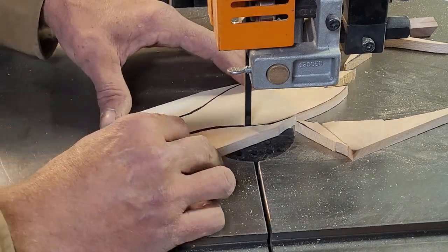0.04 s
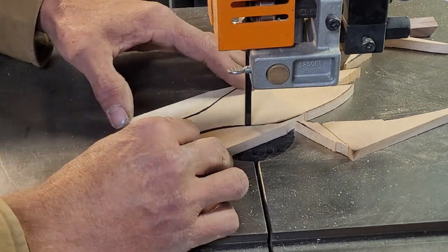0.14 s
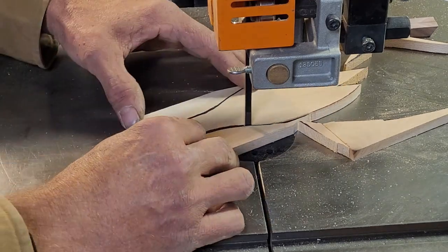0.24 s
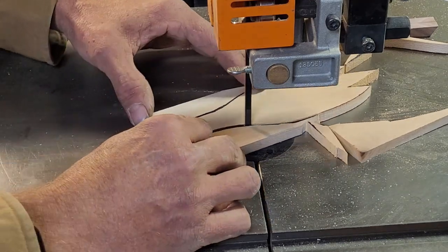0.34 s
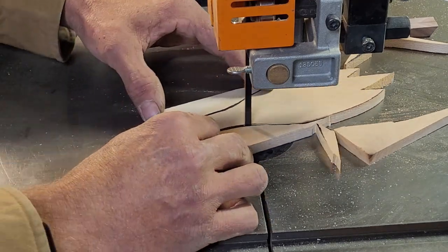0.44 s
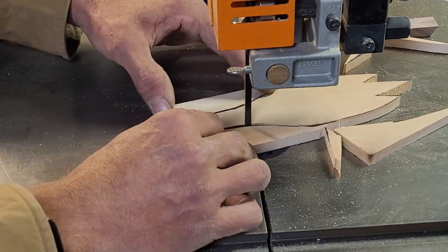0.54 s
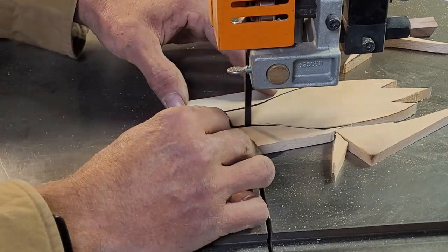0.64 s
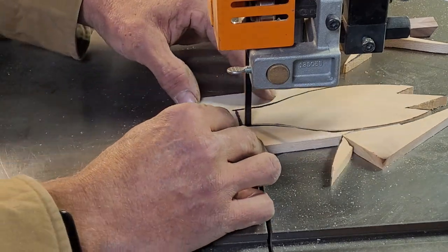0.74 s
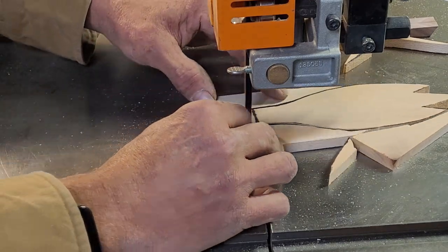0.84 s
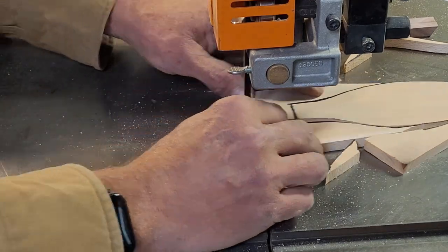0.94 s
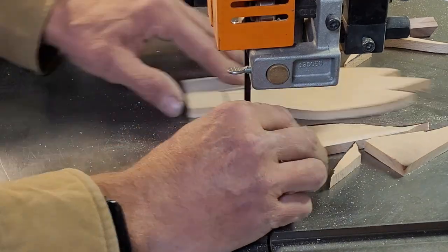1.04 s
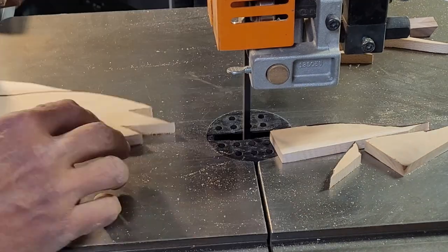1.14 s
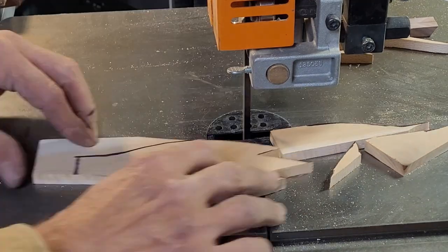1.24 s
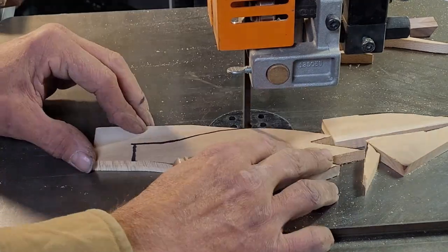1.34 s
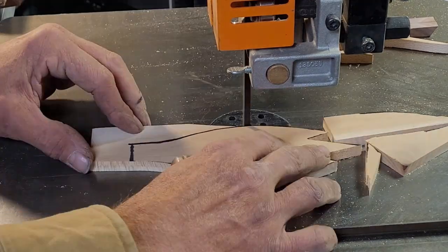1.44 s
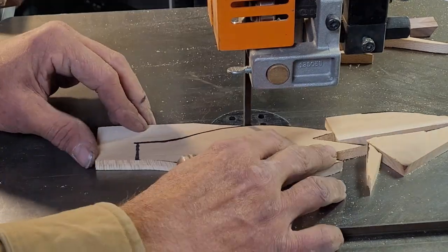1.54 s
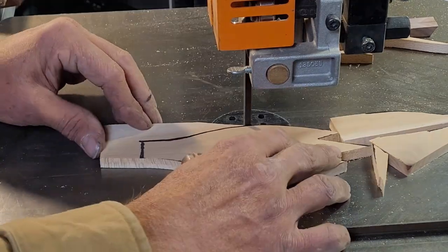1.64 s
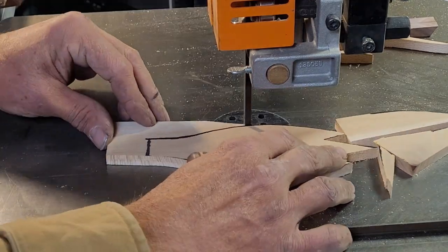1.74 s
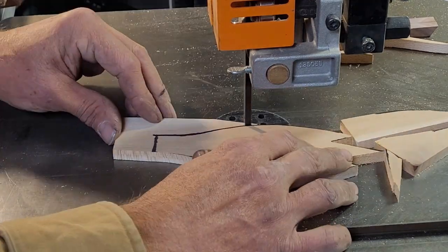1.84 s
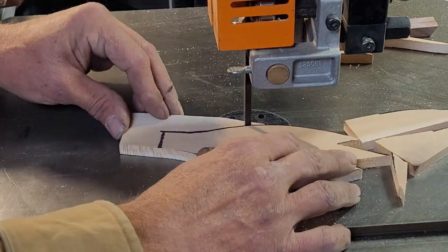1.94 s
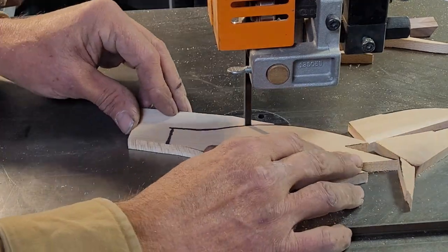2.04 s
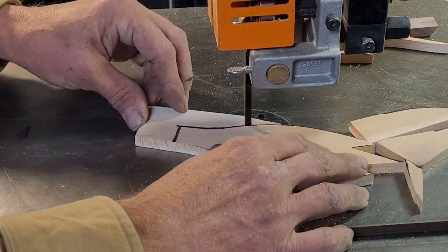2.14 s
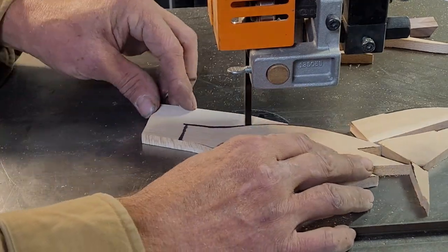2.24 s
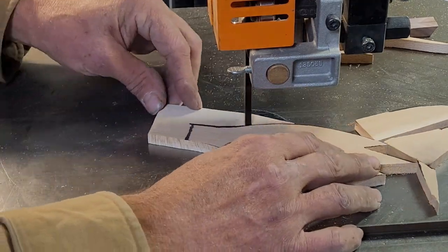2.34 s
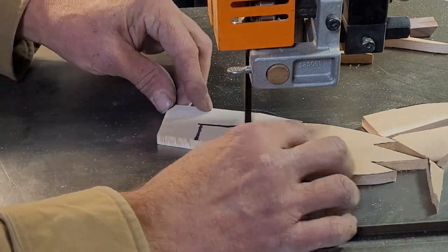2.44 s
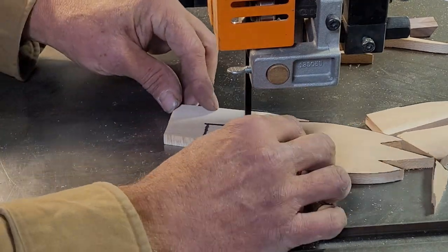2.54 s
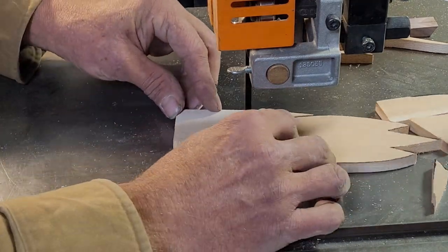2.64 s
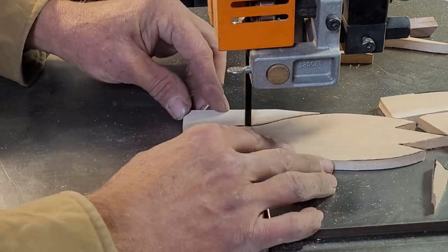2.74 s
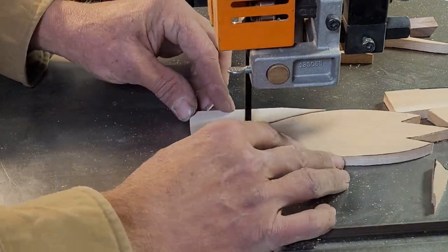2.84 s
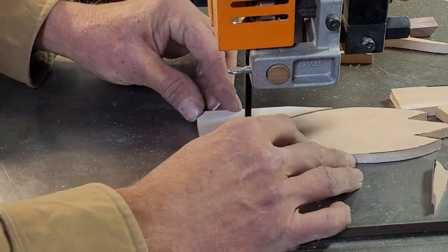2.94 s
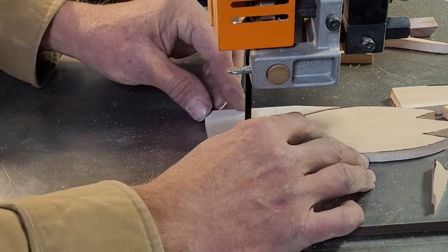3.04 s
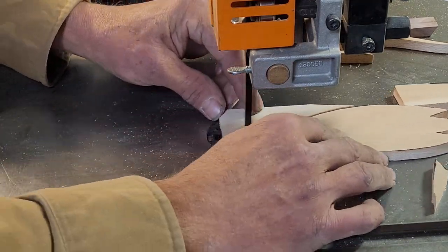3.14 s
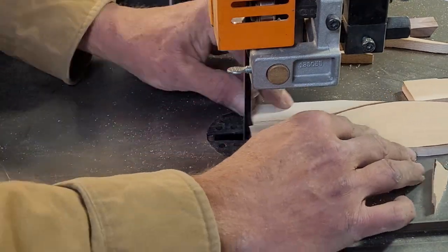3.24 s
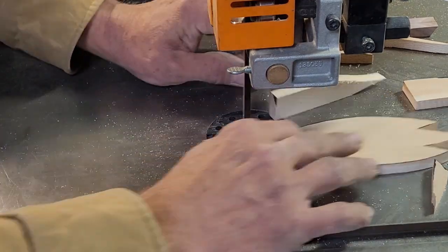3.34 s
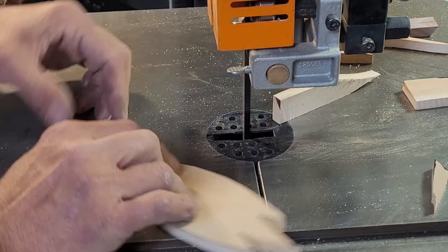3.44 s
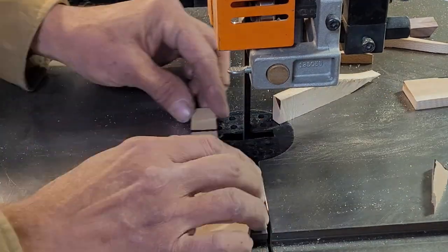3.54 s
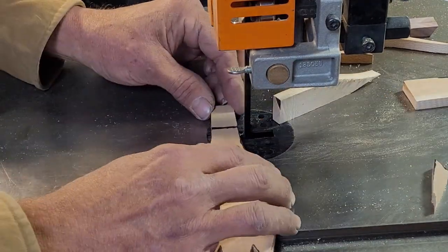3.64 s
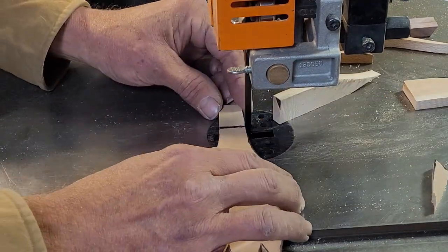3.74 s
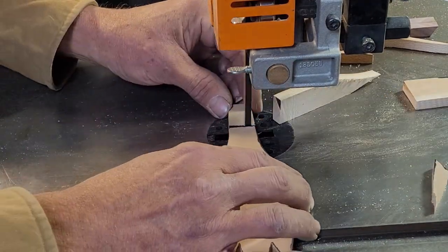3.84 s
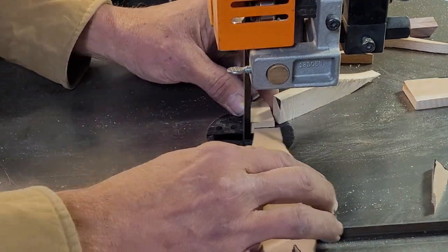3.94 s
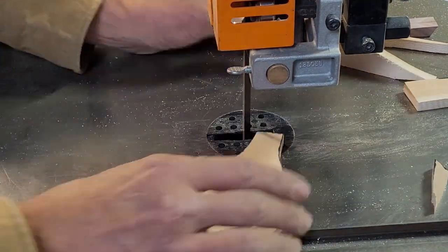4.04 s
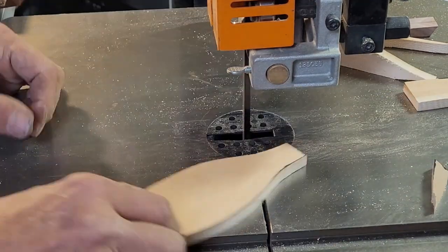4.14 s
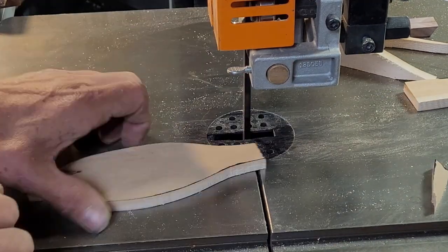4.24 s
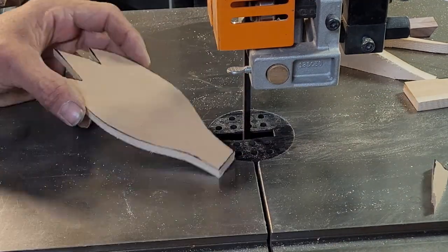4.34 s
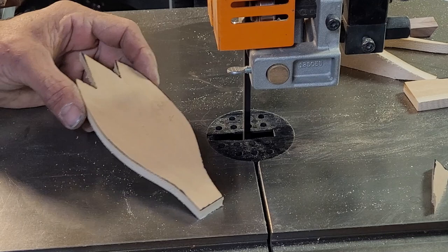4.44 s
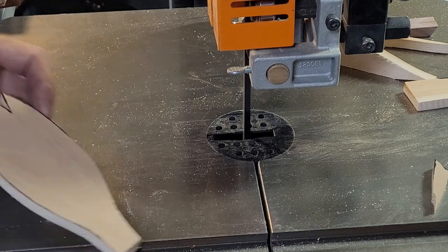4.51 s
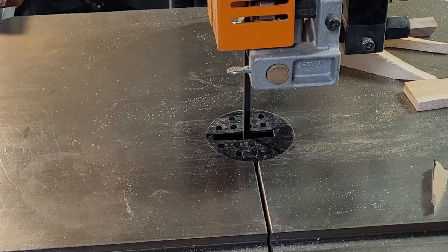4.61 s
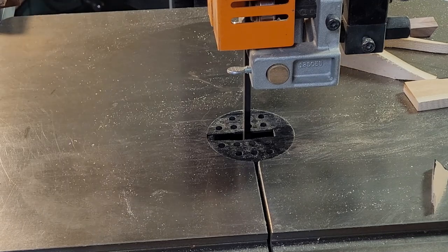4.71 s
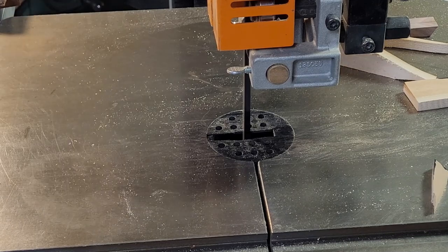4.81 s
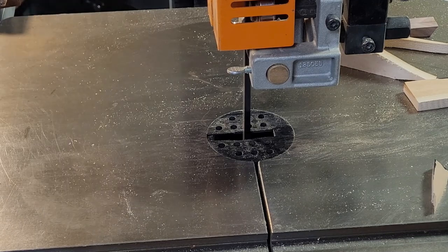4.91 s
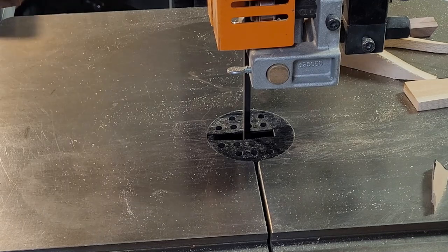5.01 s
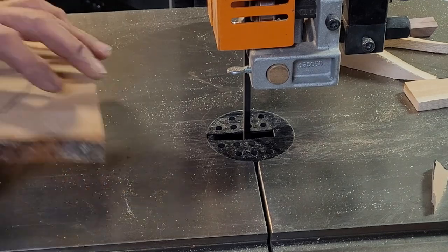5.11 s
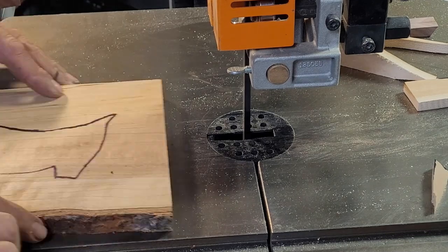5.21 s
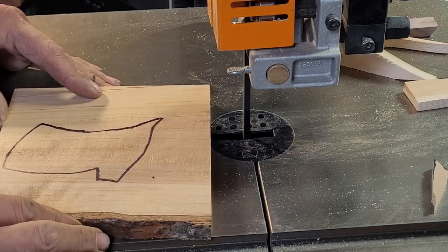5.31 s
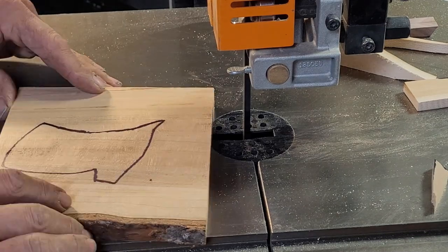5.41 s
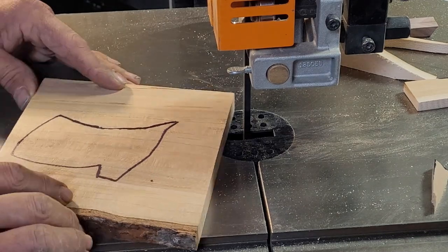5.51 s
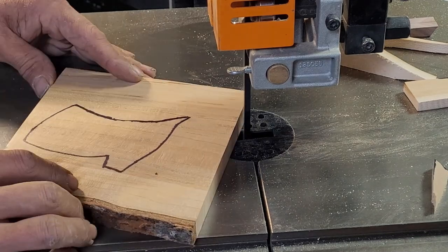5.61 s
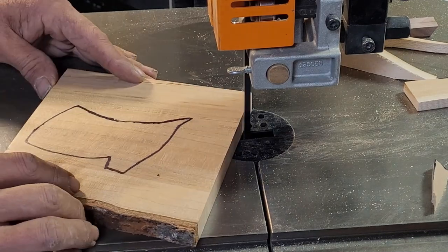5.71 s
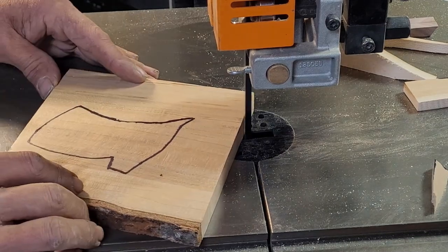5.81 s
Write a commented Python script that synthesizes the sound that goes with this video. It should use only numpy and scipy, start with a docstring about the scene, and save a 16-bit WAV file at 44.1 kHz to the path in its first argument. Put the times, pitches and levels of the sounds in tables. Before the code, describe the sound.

Close up in a workshop, a bandsaw hums and whirrs steadily. Its teeth rasp through a thin hardwood board while the blade whistles and squeals. There are three cuts, the middle one longest and the last very short, each ending with a sharp falling twang as the blade springs free. The saw then idles, a chip ticks, and another board clatters onto the metal table.

```python
"""A bandsaw runs close by in a workshop: its motor hums, its wheels and guides whirr.
From the start its teeth rasp through a thin hardwood board and set the blade singing. At 1 s the
blade springs free with a falling twang. A long cut and a short one follow, with twangs at 3.3 s and 4 s.
A chip ticks at 4.8 s, a new board clatters onto the iron table at 5.2 s and just meets the teeth at
the end. All along, an automatic gain control ducks the steady machine under every loud sound."""
import sys
import numpy as np
from scipy import signal
from scipy.fft import rfft, irfft, next_fast_len
from scipy.io import wavfile
from scipy.ndimage import uniform_filter1d, map_coordinates

SR = 44100
rng = np.random.default_rng(int(sys.argv[2]) if len(sys.argv) > 2 else 0)


def file_out(sig):
    """Save sig as 16-bit WAV at sys.argv[1]."""
    # one column per channel
    cols = np.atleast_2d(sig).T
    # limit, then scale
    lim = np.clip(cols, -1, 1)
    pcm = np.round(lim * 32767).astype(np.int16)
    wavfile.write(sys.argv[1], SR, pcm)


N = 258867

TURN_HZ = 25.46  # turns of the drive a second

# Table levels are relative: the functions add their own gains.
# The motor's hum. Each row: multiple of the motor's pitch, level in dB.
HUM_HARMONICS = [(1, 0), (2, 0), (3, 0), (4, -56)]
# The machine's low noise and its brighter running noise. Each row: frequency in Hz, level in dB.
RUMBLE_SPECTRUM = [(20, -14), (60, -11.5), (135, -12.5), (175, 0), (280, -3.5), (330, -0.5), (430, -1.5),
                   (620, 2), (800, 0.5), (1100, -9.5), (2000, -54)]
WHIRR_SPECTRUM = [(470, -35.5), (800, -5), (1080, -2), (1210, -2), (1820, -2), (1990, -11), (2090, -7.5),
                  (2280, -11), (2620, -10), (2970, -13.5), (3710, -12.5), (4310, -20), (4830, -16.5),
                  (9470, -13.5), (15800, -25.5)]
# Tones of the wheels and frame. Each row: pitch in Hz, level in dB.
FRAME_TONES = [(790.5, -61.5), (942.1, -65.5), (1045.5, -56), (1152, -58.5), (1448, -63.5), (1507, -67),
               (1620, -57), (1766, -59.5), (1884, -61.5), (2019, -63), (2143, -64), (2525, -63.5),
               (2713, -73), (3284, -67), (3978, -63.5), (4409, -69), (5954, -84), (6702, -63.5),
               (8161, -63.5), (8780, -72), (9636, -74), (10557, -75), (11596, -76)]
# How hard the machine shakes. Each row: time in seconds, whirr gain in dB, frame gain in dB.
SHAKE_LEVELS = [(0, 1, 0.5), (.85, 0, 4.5), (1.25, -1.5, 2), (1.48, 2, 4), (1.75, 0, 2.5), (2.4, 0, -2),
                (3.45, 0.5, 0.5), (3.8, -0.5, 0.5), (4.2, 0, 1), (4.7, 0, 2), (4.98, 0.5, 0.5),
                (5.4, -0.5, -0.5), (5.87, -.5, -0.5)]
# Resonances of the idling blade and its guides. Each row: frequency in Hz, width in Hz, level in dB.
GUIDE_MODES = [(2757, 41, -7), (3990, 42, -1.5), (4210, 55, -10), (4373, 39, -1.5), (5790, 68, -11.5),
               (8260, 130, -15), (8970, 73, -17), (9700, 160, -20), (10500, 150, -15.5), (11900, 90, -26)]
# The droning cover. Each row: time in seconds, level in dB.
COVER_LEVELS = [(0.0, -58), (0.8, -54.5), (1.26, -64), (1.49, -52.5), (1.86, -62), (2.17, -53), (2.53, -69),
                (3.63, -92), (3.86, -59), (4.05, -75), (4.17, -56), (4.33, -59), (4.38, -80), (4.51, -56),
                (5.21, -59), (5.28, -79), (5.44, -60), (5.87, -62)]

# Resonances of a flying chip's tick. Each row: frequency in Hz, width in Hz, level in dB.
CHIP_MODES = [(8860, 660, -5), (10300, 570, -2), (14500, 3000, -15)]
# The new board lands. Each row: time in seconds, then knock, click and crack levels in dB.
BOUNCES = [(5.2224, -27, -52, -41), (5.2304, -35, -37, -29), (5.2332, -29.5, -50, -42),
           (5.2372, -37, -29, -27), (5.2392, -40, -38, -28), (5.2433, -31, -28, -30),
           (5.2581, -31, -30, -20.5)]
# Board and table ring, low and high. Each row: pitch in Hz, level in dB, seconds to fade by 60 dB.
KNOCK_MODES = [(883, -8.7, .08), (1060, -14, .05), (1370, -11, .05), (1640, -11, .05), (1840, -11, .05),
               (2130, -13, .04), (2330, -13, .035), (2760, -9, .035), (3455, -4.5, .035), (3563, -11, .035)]
CLICK_MODES = [(4334, -16, .03), (4850, -10, .045), (5643, -4, .055), (5790, -5, .07), (5964, -10, .06),
               (9251, -1.5, .045), (9870, -8, .03)]
# The crack of a bounce. Each row: frequency in Hz, level in dB.
CRACK_SPECTRUM = [(400, -34), (1000, -11), (3000, -4), (3900, -6), (5500, 0), (7300, -7), (9800, 2),
                  (11000, -5), (13400, -8), (15200, -5.5)]

# Passing pure rings of the blade.
# Each row: start and end in seconds, pitch in Hz, level in dB, throb depth from 0 to 1.
BLADE_RINGS = [(0.47, 1.005, 2597, -49.5, .7), (1.068, 1.45, 2680, -59, .1), (1.536, 1.76, 6716, -51, .3),
               (1.66, 2.15, 7103, -56, .3), (4.08, 4.48, 2687, -56, .1)]
# Brief squeals. Each row: start and end in seconds, pitch in Hz, width in Hz, level in dB.
BLADE_SQUEALS = [(-0.1, 0.348, 5600, 1400, -44.5), (-0.07, 0.34, 4870, 100, -39),
                 (-0.05, 0.363, 5165, 63, -44), (-0.05, 0.33, 6080, 130, -51), (0.45, 1.01, 2610, 110, -50),
                 (0.993, 1.04, 1580, 180, -40), (0.963, 1.06, 13800, 3000, -44),
                 (1.703, 2.352, 1827, 130, -47.5), (2.0, 2.353, 10200, 3100, -43),
                 (0.96, 1.044, 4850, 450, -41), (2.238, 2.5, 2600, 74, -53), (2.307, 2.37, 7900, 300, -45),
                 (2.658, 3.352, 1172, 57, -55.5), (3.192, 3.317, 2650, 370, -45.5),
                 (3.23, 3.338, 4800, 350, -47), (3.24, 3.336, 4700, 2600, -45),
                 (3.305, 3.34, 6150, 600, -38.5), (3.828, 4.02, 4780, 220, -47.5),
                 (3.832, 4.003, 3526, 74, -47), (3.81, 3.93, 2620, 83, -49),
                 (3.99, 4.086, 13200, 1500, -51)]
# The blade springs free. Each row: time in seconds, twang level in dB, level of brushing teeth in dB.
BLADE_RELEASES = [(1.029, -25.5, -46), (3.3465, -25.5, -42), (4.040, -24.5, -40)]
# A twang's bending waves. Each row: peak in seconds after the release, rise and decay in seconds,
# pitch at the peak in Hz, fall in Hz a second, roughness in radians, level in dB.
BENDING_WAVES = [(.003, .002, .003, 4270, 30000, .3, -1), (.0095, .002, .006, 4030, 12000, .7, -6),
                 (.011, .005, .005, 3200, 25000, .9, -7.5), (.0235, .011, .007, 2680, 16000, .25, -2.5),
                 (.038, .003, .012, 2600, 14000, 1.2, -11.5), (.052, .012, .01, 1650, 22000, 1.4, -13.5)]
# Resonances of the freed blade. Each row: frequency in Hz, width in Hz, level in dB.
RATTLE_MODES = [(2650, 300, -2), (3300, 400, -3), (4200, 300, -3), (6300, 150, -12), (8300, 300, -15)]

# The teeth are in the wood. Each row: start, end and fade-in time in seconds,
# starting load in dB, growth in dB a second as the push gets harder.
SAW_CUTS = [(-0.2, 1.02, .05, -45.5, 3.5), (1.52, 3.353, 0.23, -44.5, 1.5), (3.8, 4.046, 0.023, -45, 14),
            (5.832, 6.3, 0.014, -49.5, 0)]
# The noise of tearing wood. Each row: frequency in Hz, level in dB.
RASP_SPECTRUM = [(1500, -42), (3000, -15), (4300, -8), (5500, -1), (6100, 0.5), (6550, -3), (7300, -0.5),
                 (8000, 0), (8900, -5), (9500, -2.5), (11500, 2), (12500, -1), (14300, -1), (15700, -8.5)]
# Resonances of the board, then of the cutting blade: bright ones, its low note, its whistle.
# Each row: frequency in Hz, width in Hz, level in dB.
BOARD_MODES = [(1150, 84, 1.5), (1660, 520, -2.5), (1740, 34, 8), (2580, 58, 6.5), (2820, 220, -1.5),
               (3410, 510, 2.5)]
STEEL_MODES = [(2860, 60, -2), (3200, 200, -1), (3550, 200, -3), (4400, 70, -6), (5340, 70, -3),
               (6130, 90, 1), (6290, 120, 4), (6700, 60, -1), (7400, 70, -4), (7950, 120, -3),
               (8400, 110, 1), (9270, 150, 4), (9500, 150, 2), (10020, 200, 2), (10850, 160, -2),
               (11470, 220, 1), (12350, 160, -3), (13300, 200, -4), (15650, 170, 2)]
LOW_NOTE_MODES = [(1744, 69, 0)]
WHISTLE_MODES = [(4700, 110, -4), (4850, 100, -1), (4968, 30, 3), (5160, 50, -7)]
# The cutting blade's three notes and its faint extra tones. Each row: pitch in Hz, level in dB.
LOW_NOTE_TONES = [(1680.4, -17), (1731.4, 0), (1807.8, -19), (1884.1, -14)]
MIDDLE_NOTE_TONES = [(3972, -2), (3997, -9), (4022.7, -5)]
WHISTLE_TONES = [(4659.2, -18), (4684.6, -18), (4761, -16), (4837.9, -14), (4863.3, -16), (4888.3, -15),
                 (4965, 2.5), (4990.4, -9), (5041.3, -15), (5143, -18), (5168.6, -16)]
FAINT_TONES = [(2596.4, -19), (2647.3, -19), (6186.9, -18), (6874, -22), (7102.8, -17), (8403, -19),
               (11451, -24), (13392, -16)]
# How loudly the blade sings, one list for each full cut.
# Each row: time in seconds, then low note, whistle and middle note levels in dB.
SONG_LEVELS = [
    [(0.0, -45.5, -49, -60), (0.19, -44.5, -40.3, -60), (0.27, -46, -46.5, -60), (0.55, -45, -51.5, -59),
     (0.7, -42, -54, -58), (0.9, -41.2, -57.5, -55), (1.02, -40.5, -53, -49)],
    [(1.7, -48, -53.5, -56), (1.92, -48, -52, -53), (2.15, -48.2, -55.5, -61), (2.33, -47.5, -57.5, -56),
     (2.55, -47, -50.5, -49.5), (2.7, -47.6, -52.5, -51.5), (2.79, -48, -57, -59), (2.9, -48, -54, -53),
     (3.08, -48, -55, -51), (3.2, -44, -51.5, -53), (3.24, -45.5, -58, -55), (3.33, -51, -58, -53)],
    [(3.85, -53, -65, -53), (3.95, -47.3, -65, -53), (4.03, -50, -57, -54)],
]

# The workshop's echo. Each row: frequency in Hz, seconds to fade by 60 dB.
ECHO_TIMES = [(200, 0.081), (2000, 0.11), (12000, 0.068)]
# How alike the two ears hear the sound. Each row: frequency in Hz, likeness from 0 to 1.
EAR_LIKENESS = [(60, 0.77), (130, 0.78), (290, 1), (640, 0.96), (1410, 0.85), (3100, 0.68), (6820, 0.34),
                (15000, 0.24)]
# Which side is louder. Each row: frequency in Hz, left minus right in dB.
BALANCE = [(60, -3), (99, 3), (160, -3), (270, 5), (450, -3), (740, 1.5), (1220, -0.5), (2010, -4.5),
           (3330, -1.5), (5500, -2), (9080, -2.5), (15000, 0)]


def amp(db):
    """Turn decibels into a gain."""
    return np.exp(np.log(10) / 20 * np.asarray(db))


def unit(x):
    """Scale a signal to an average power of 1."""
    return x / np.sqrt(np.mean(x ** 2) + 1e-20)


def clock():
    """The time of every sample, in seconds."""
    return np.arange(N) / SR


def along(points, hz):
    """Read between (Hz, value) points on a logarithmic frequency scale."""
    freqs, values = np.transpose(points)
    return np.interp(np.log(hz + 1), np.log(freqs + 1), values)


def curves(rows):
    """Join timed rows with lines: one curve for each column after the time."""
    times, *columns = np.transpose(rows)
    return np.array([np.interp(clock(), times, column) for column in columns])


def wobble(rate):
    """A smooth curve through `rate` random values a second."""
    knots = rng.standard_normal(int(N * rate / SR) + 4)
    coarse = np.linspace(0, N / SR, len(knots) * 8)
    return np.interp(clock(), coarse, map_coordinates(knots, [coarse * rate]))


def arch(start, end):
    """A rounded swell between two times."""
    progress = np.clip((clock() - start) / (end - start), 0, 1)
    return np.sqrt(np.abs(np.sin(np.pi * progress)))


def blow(start, t60):
    """A hit's loudness: it jumps up, then fades by 60 dB in t60 seconds."""
    age = clock() - start
    return (age > 0) * amp(-60 * np.maximum(age, 0) / t60)


def filtered(x, response):
    """Filter x; the response gives the gain at each frequency."""
    size = next_fast_len(N + SR // 4, True)
    return irfft(rfft(x, size) * response(np.fft.rfftfreq(size, 1 / SR)), size)[..., :N]


def spectrum(points):
    """A response that follows (Hz, dB) points."""
    return lambda hz: amp(along(points, hz))


def resonances(modes):
    """A response with a peak at each frequency where an object likes to ring."""
    return lambda hz: sum((-1) ** k * amp(db) * 1j * hz * width / (peak ** 2 - hz ** 2 + 1j * hz * width)
                          for k, (peak, width, db) in enumerate(modes))


def spread(hz):
    """Stereo width as an angle: the treble differs more from ear to ear."""
    return np.arccos(np.clip(along(EAR_LIKENESS, hz), 0, 1)) / 2


def white():
    """Two unrelated white noises."""
    return rng.standard_normal((2, N))


def voiced(noises, response):
    """Colour two noises and blend them into stereo of power 1."""
    mid, side = filtered(noises, lambda hz: response(hz) * np.cos(spread(hz) - [[0], [np.pi / 2]]))
    return unit(np.array([mid + side, mid - side]))


def tone(hz, drift, shift=0):
    """A stereo sine wave whose phase wanders by about `drift` radians."""
    phase = 2 * np.pi * (hz * clock() + rng.random()) + drift * wobble(9) + shift
    return np.sqrt(2) * np.sin([phase + spread(hz), phase - spread(hz)])


def gain_control(x, threshold_db=-47, depth_db=5, attack_s=0.041, hold_s=0.2, release_s=0.07):
    """Loud treble turns the gain down; it holds, then comes back, so the hum swells in the pauses."""
    step = SR // 200
    treble = signal.sosfilt(signal.butter(2, 2000, "highpass", fs=SR, output="sos"), x.mean(axis=0))
    keep = np.exp(-1 / (attack_s * SR))
    level = np.sqrt(signal.lfilter([1 - keep], [1, -keep], treble ** 2)[::step] + 1e-20)
    wanted_db = depth_db * np.maximum(1 - amp(threshold_db) / level, 0)
    steps, lags = np.arange(len(level)), np.arange(SR // step)
    memory = np.clip(1 - (lags * step / SR - hold_s) / release_s, 0, 1)
    duck_db = np.max(wanted_db[np.abs(steps[:, None] - lags)] * memory, axis=1)
    return x * amp(-np.interp(np.arange(N), steps * step, duck_db))


def workshop_echo(x):
    """The room's short echo, with a different tail at each ear."""
    hz, t, bands = signal.stft(rng.standard_normal((2, SR // 3)), SR, nperseg=256)
    tail = signal.istft(bands * amp(-60 * t / along(ECHO_TIMES, hz)[:, None]), SR, nperseg=256)[1]
    return signal.fftconvolve(x, tail / np.linalg.norm(tail[0]), axes=1)[:, :N]


def whine(peak_s=1.55, width_s=0.43, peak_hz=333, climb_hz_per_s=55):
    """A faint low tone climbs behind the machine and fades."""
    t = clock() - peak_s
    hz = peak_hz + climb_hz_per_s * t
    swell = amp(-60.5) / (1 + np.abs(t / width_s) ** 3)
    return np.sqrt(2) * swell * np.sin(2 * np.pi * np.cumsum(hz) / SR + 0.44 * wobble(12))


def turning(repeat, spiky_db):
    """Tiny uneven impacts; the share `repeat` comes back with every turn of the drive."""
    def impacts():
        return unit(white() * amp(spiky_db * wobble(1700)))
    looped = impacts()[:, np.arange(N) % round(SR / TURN_HZ)]
    return np.sqrt(repeat) * unit(looped) + np.sqrt(1 - repeat) * impacts()


def band_ripple(x, depth_db):
    """The steel band's many close resonances lay fine peaks and dips over the treble."""
    grid_hz = np.arange(0, SR / 2, 55)
    ripple_db = depth_db * rng.standard_normal(len(grid_hz)) * (grid_hz > 2000)
    return filtered(x, lambda hz: amp(np.interp(hz, grid_hz, ripple_db)))


def machine(motor_hz=252.55, cover_hz=691.2):
    """The motor hums, the cover drones, and the wheels, frame and guides whirr."""
    hum = amp(-52.5) * sum(amp(db) * tone(k * motor_hz, drift=0.11 * k) for k, db in HUM_HARMONICS)
    rumble = amp(-55.5) * voiced(white(), spectrum(RUMBLE_SPECTRUM))
    rolling = band_ripple(turning(repeat=0.45, spiky_db=1.5), depth_db=2.2)
    whirr_db, frame_db = curves(SHAKE_LEVELS)
    whirr = amp(-45.5 + 0.49 * wobble(8.7)) * voiced(rolling, spectrum(WHIRR_SPECTRUM))
    # shaking swells the body of the whirr, not its hiss
    whirr += (amp(whirr_db) - 1) * filtered(whirr, lambda hz: 1 / (1 + (hz / 5000) ** 4))
    frame = sum(amp(db - 1.8 + 2.1 * wobble(5)) * tone(hz, drift=1.1) for hz, db in FRAME_TONES)
    guides = amp(-53 + 1.9 * wobble(18)) * voiced(white(), resonances(GUIDE_MODES))
    cover = amp(curves(COVER_LEVELS)[0] + 4) * tone(cover_hz, drift=0.72)
    return hum + rumble + whirr + amp(frame_db) * frame + guides + cover


def struck(modes, start):
    """A hit starts fading tones, at new strengths every time."""
    t, out = np.arange(SR // 8) / SR, np.zeros(N)
    ring = sum(amp(db + rng.normal(0, 1.7) - 60 * t / t60) * np.sin(2 * np.pi * hz * t)
               for hz, db, t60 in modes)
    out[round(start * SR):][:len(t)] = ring
    return out


def chip_and_board(chip_s=4.8485):
    """A chip flicks off the blade, then the new board bounces on the iron table."""
    ring, cracks = 0, 0
    for start, knock_db, click_db, crack_db in BOUNCES:
        ring += amp(knock_db) * struck(KNOCK_MODES, start) + amp(click_db) * struck(CLICK_MODES, start)
        cracks += amp(crack_db) * (blow(start, t60=0.016) + amp(-15) * blow(start, t60=0.07))
    chip = amp(-33.5) * blow(chip_s, t60=0.049) * voiced(white(), resonances(CHIP_MODES))
    hits = ring + amp(-1.5) * cracks * voiced(white(), spectrum(CRACK_SPECTRUM)) + chip
    # the tick and the clatter carry almost no bass
    return signal.sosfilt(signal.butter(4, 480, "highpass", fs=SR, output="sos"), hits)


def throb(depth, flutter_db=1):
    """A blade note swells once with every turn of the drive and flutters a little."""
    pulse = 1 + depth * np.sin(2 * np.pi * (TURN_HZ * clock() + rng.random()))
    return pulse * amp(flutter_db * wobble(70))


def rings():
    """Now and then one of the blade's resonances rings out as a clear tone."""
    return sum(amp(db) * arch(start, end) * throb(depth) * tone(hz, drift=0.5)
               for start, end, hz, db, depth in BLADE_RINGS)


def squeals():
    """The twisted blade rubs, pulsing with the drive, and a resonance swells for a moment."""
    rub = turning(repeat=0.36, spiky_db=3)
    return sum(amp(db) * arch(start, end) * voiced(rub, lambda f: resonances([(hz, width, 0)])(f) ** 2)
               for start, end, hz, width, db in BLADE_SQUEALS)


def twangs(brush_delay_s=0.01):
    """Bending waves run along the freed blade, the high ones first, so the pitch falls."""
    t = np.arange(SR // 8) / SR
    glide, rattle_gain, brush_gain = np.zeros(N + SR), 0, 0
    for start, twang_db, brush_db in BLADE_RELEASES:
        # the blade also rattles, and swings back to brush the board
        rattle_gain += amp(twang_db) * blow(start, t60=0.2)
        brush_gain += amp(brush_db) * blow(start + brush_delay_s, t60=0.22)
        for peak, rise, decay, hz, fall, rough, db in BENDING_WAVES:
            age = t - peak
            swell = amp(twang_db + db) * np.exp(-(age / np.where(age < 0, rise, decay)) ** 2)
            cycles = hz * age - fall * age ** 2 / 2 + rng.random()
            phase = 2 * np.pi * cycles + rough * wobble(800)[:len(t)]
            glide[round(start * SR):][:len(t)] += swell * np.sin(phase)
    rattle = amp(-9.5) * rattle_gain * voiced(white(), resonances(RATTLE_MODES))
    brush = brush_gain * voiced(white(), spectrum(RASP_SPECTRUM))
    return glide[:N] + rattle + brush


def wood_grain(x, depth_db):
    """The changing grain shifts the rasp's colour in random patches, about 800 Hz by 0.15 s."""
    bands = signal.stft(x, nperseg=512)[2]
    patches = uniform_filter1d(rng.standard_normal(bands.shape[1:]), size=9, axis=0)
    patches = uniform_filter1d(patches, size=26, axis=1)
    return signal.istft(bands * amp(depth_db * unit(patches)), nperseg=512)[1][:, :N]


def singing(tones, jitter, waver_db):
    """The blade's tones share its slightly unsteady speed; each wavers in level on its own."""
    slip = jitter * wobble(6.98)
    return sum(amp(db + waver_db * wobble(7)) * tone(hz, drift=0.2, shift=slip) for hz, db in tones)


def feeding(fade_db_per_s=193, edge_s=0.062, song_build_s=0.064):
    """Wood is pushed into the teeth: the gains of rasp, chatter and song rise and fall with each cut."""
    t, rasp, chatter, song = clock(), 0, 0, 0
    for start, end, entry, load_db, push in SAW_CUTS:
        fade_in = np.sqrt(np.clip((t - start) / entry, 0, 1))
        contact = fade_in * amp(-fade_db_per_s * np.maximum(t - end, 0))
        load = contact * amp(load_db + push * np.clip(t - start, 0, end - start))
        # near the edge the thinning wood chatters more and rasps a little louder
        edge = np.exp(-np.abs(t - end) / edge_s)
        rasp += load * amp(0.5 * edge)
        chatter += load * amp(-8 + 3.5 * edge)
        # the blade needs a moment to start singing
        song += contact * np.sqrt(np.clip((t - start - entry / 2) / song_build_s, 0, 1))
    return rasp, chatter, song


def sawing():
    """The teeth tear the wood, shake the board and make the blade sing."""
    rasp, chatter, song = feeding()
    teeth = wood_grain(turning(repeat=0.59, spiky_db=3.2), depth_db=2)
    teeth = band_ripple(teeth, depth_db=2)
    tearing = amp(-0.1 + 0.51 * wobble(6.74)) * voiced(teeth, spectrum(RASP_SPECTRUM))
    steel = amp(-2.5 + 1.2 * wobble(12)) * voiced(turning(0.55, spiky_db=4), resonances(STEEL_MODES))
    faint = amp(-2 + 1.5 * wobble(6)) * singing(FAINT_TONES, jitter=0.5, waver_db=2)
    board = amp(0.52 * wobble(18)) * voiced(turning(0.27, spiky_db=-0.5), resonances(BOARD_MODES))
    # the low note and the whistle are each pure tones plus a ringing hiss
    low = amp(3.5) * throb(0.28) * singing(LOW_NOTE_TONES, jitter=0.15, waver_db=0.8)
    low += amp(-5) * voiced(turning(0.4, spiky_db=4), resonances(LOW_NOTE_MODES))
    whistle = amp(1.5) * throb(0.35) * singing(WHISTLE_TONES, jitter=0.18, waver_db=0.6)
    whistle += amp(0.3) * voiced(turning(0.3, spiky_db=3), resonances(WHISTLE_MODES))
    middle = amp(-1.2) * singing(MIDDLE_NOTE_TONES, jitter=0.9, waver_db=1)
    low_gain, whistle_gain, middle_gain = amp(curves(np.concatenate(SONG_LEVELS)))
    notes = low_gain * low + whistle_gain * whistle + middle_gain * middle
    # the level dips as the last fibres give way, just before the blade springs free
    dips = sum(np.exp(-((clock() - start + 0.0035) / 0.004) ** 2) for start, *_ in BLADE_RELEASES)
    return amp(-7 * dips) * (rasp * (tearing + steel + faint) + chatter * board + song * notes)


def scene():
    """Mix it all: the motor's pitch leans a little to the left, the blade's notes to the right."""
    hits = twangs() + chip_and_board()
    mix = machine() + whine() + sawing() + squeals() + rings() + hits + amp(-6) * workshop_echo(hits)
    return filtered(mix, lambda hz: amp(np.outer([0.5, -0.5], along(BALANCE, hz))))


def record(dry):
    """The gain control ducks the loud moments, and the very highest treble is cut off."""
    return filtered(gain_control(dry), lambda hz: hz < 15850)


dry = scene()
out = record(dry)
file_out(out)
```